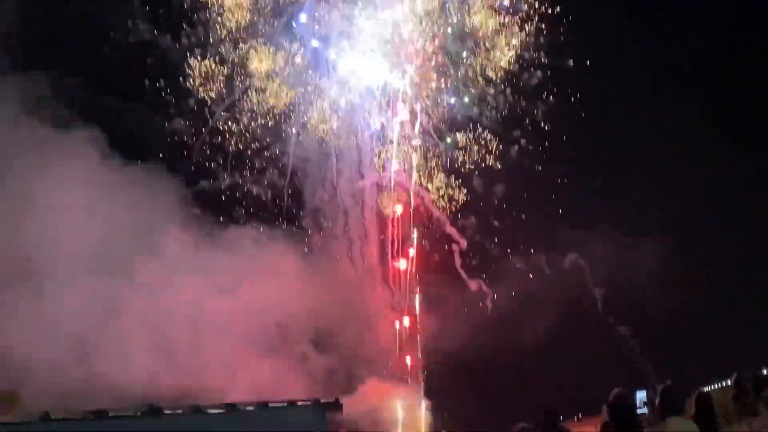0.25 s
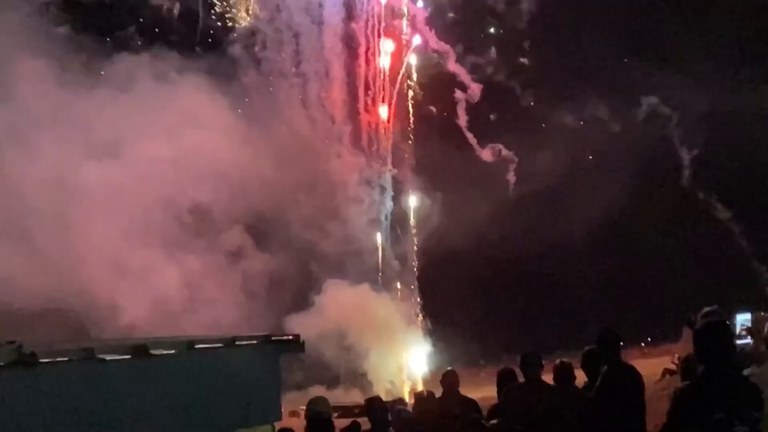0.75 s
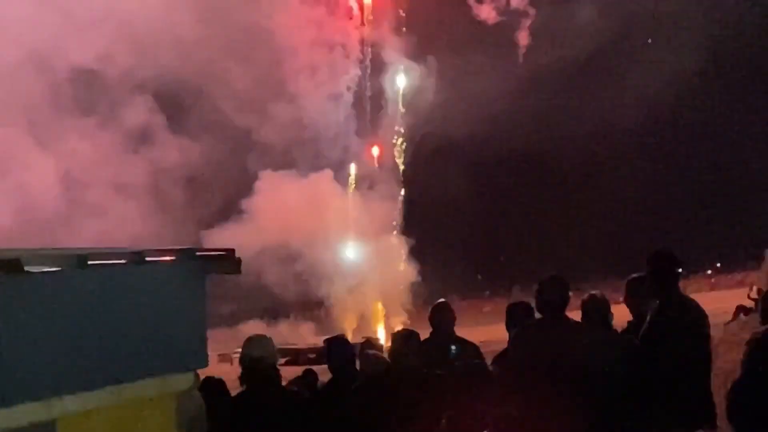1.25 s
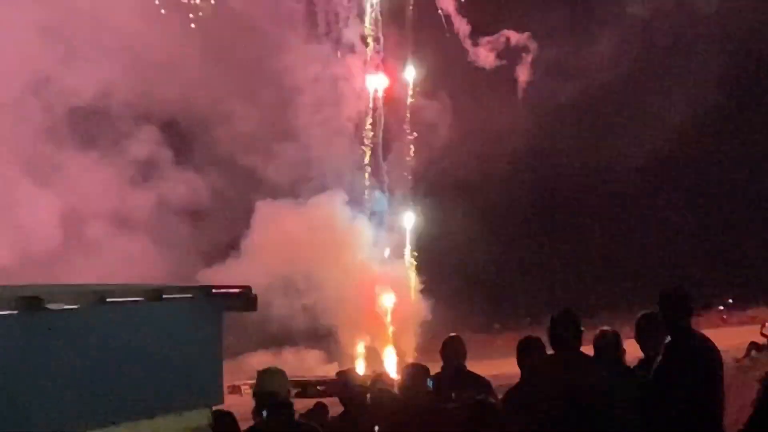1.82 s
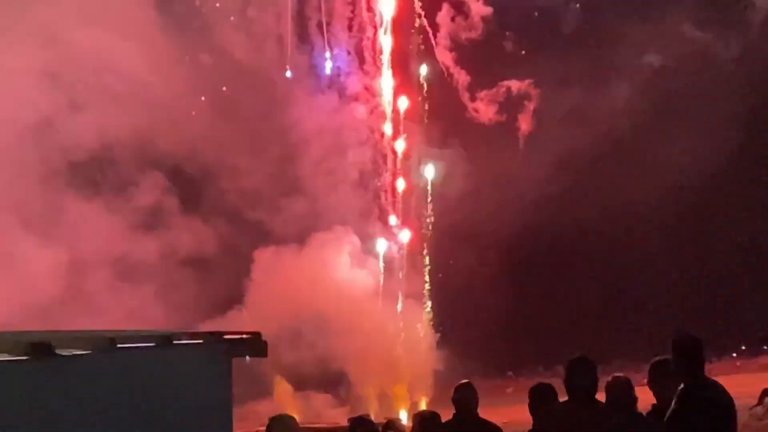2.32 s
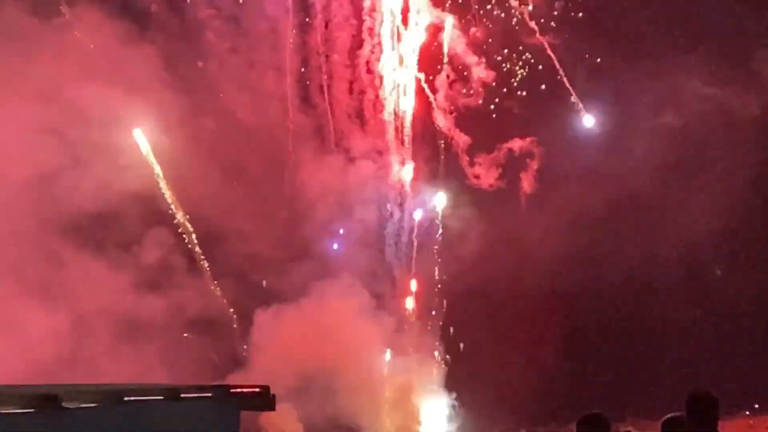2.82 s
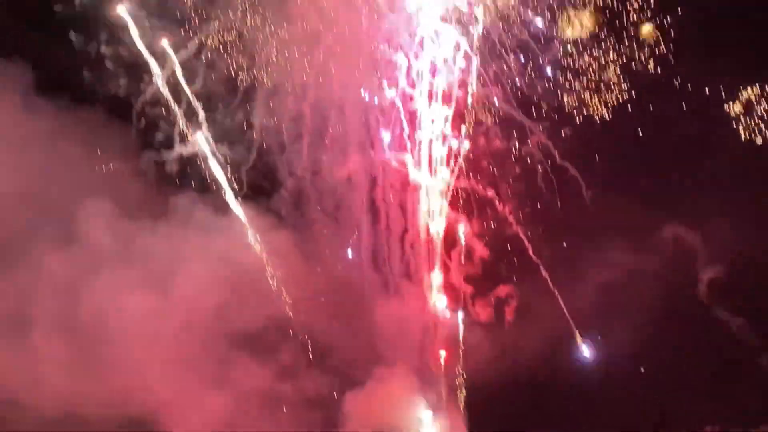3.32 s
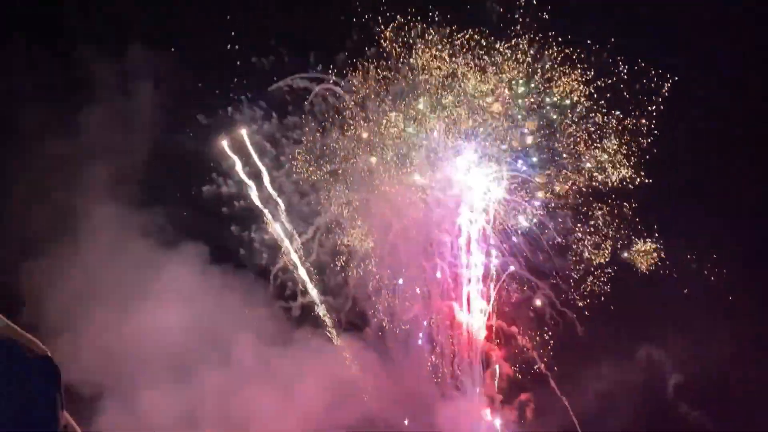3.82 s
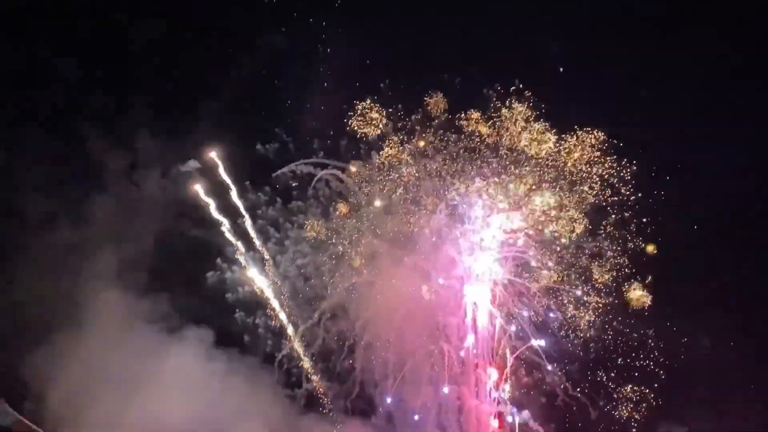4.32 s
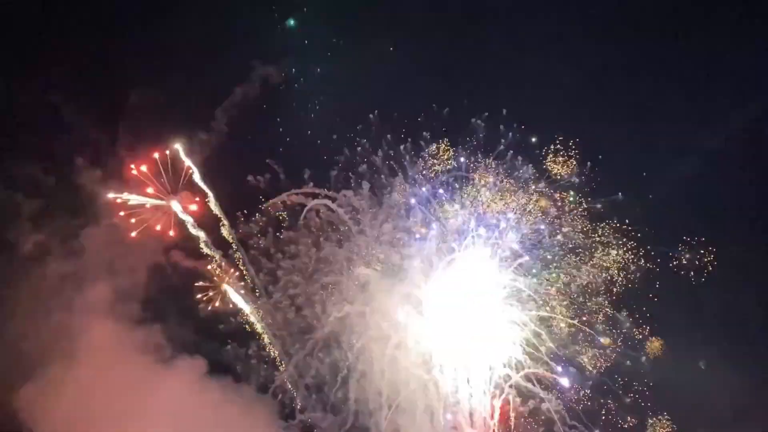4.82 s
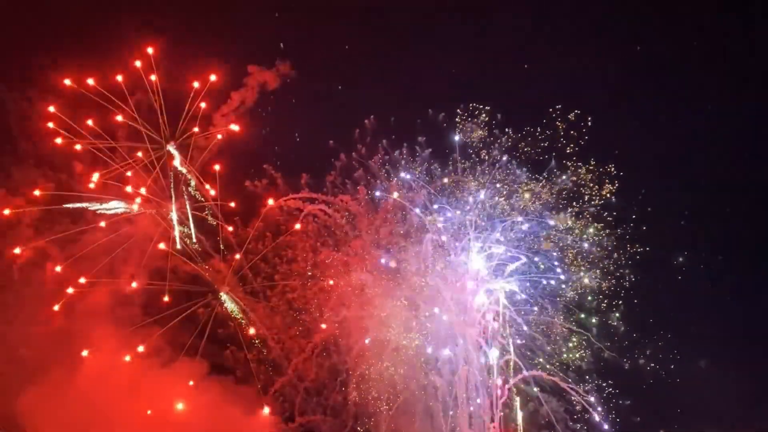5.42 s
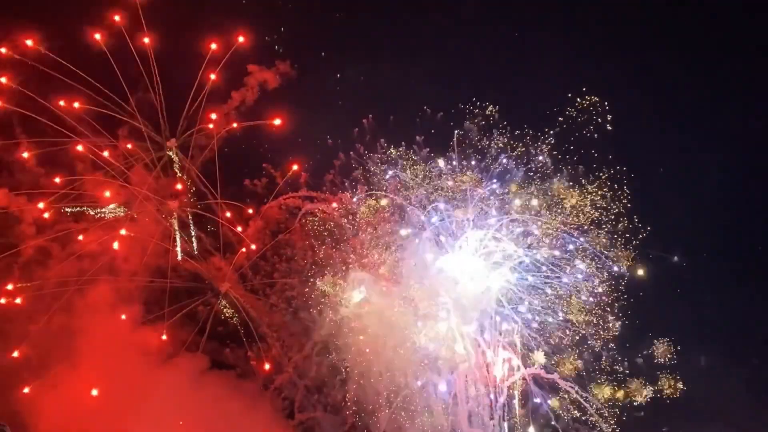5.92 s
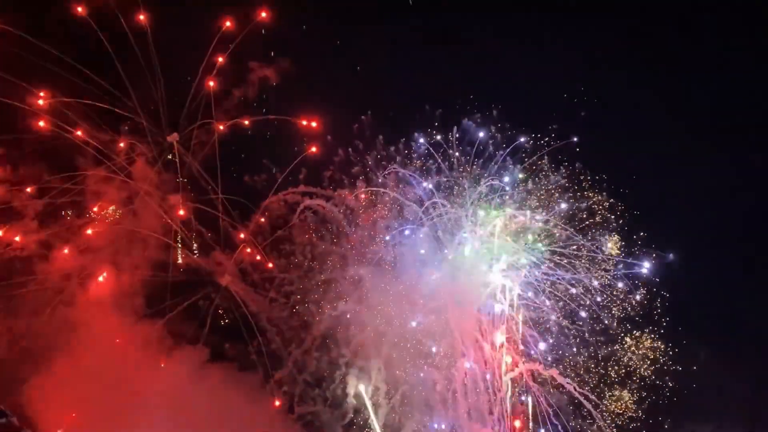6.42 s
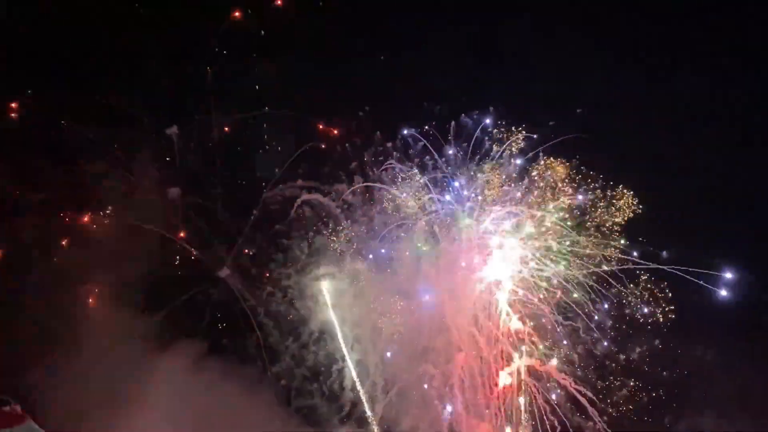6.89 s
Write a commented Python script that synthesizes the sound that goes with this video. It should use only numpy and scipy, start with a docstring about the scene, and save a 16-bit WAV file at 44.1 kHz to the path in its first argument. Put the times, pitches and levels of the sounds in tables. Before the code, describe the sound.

An unbroken volley of firework bangs, already under way and still going at the end. Punchy bursts come in ones, pairs and tight clusters over a continuous dull rumble. Dry crackle swells and dies repeatedly, thickest with snapping pops from four to six and a half seconds. Low mortar thumps and weighty booms add depth. Open ground with walls nearby, caught on a handheld phone with wide, bright cracks and rounded peaks.

```python
"""Open ground at night, in the crowd: a fireworks barrage heard on a phone.
Shells send shock fronts, ground bounces and low booms; the phone delays the lows, so bangs sweep down.
Clouds of crackling stars, built from random clicks, flare, burn and die out; stray stars pop.
Low thumps come from mortar launches and from the deep weight under a few heavy shell bursts.
Fading noise makes the echoes of nearby walls and the far field.
Halfway through, the phone swings up to the sky and the treble changes colour."""
import sys
import numpy as np
from scipy import signal
from scipy.fft import rfft, irfft, next_fast_len
from scipy.io import wavfile

SR = 44100
rng = np.random.default_rng(int(sys.argv[2]) if len(sys.argv) > 2 else 0)


def dump_mix(stems):
    """Bounce the given channels to the path in sys.argv[1] as a 16-bit WAV at rate SR."""
    frames = np.atleast_2d(stems).T  # one column per channel
    limited = np.clip(frames, -1, 1)  # hard clip at full scale
    pcm = np.round(limited * 32767).astype(np.int16)
    wavfile.write(sys.argv[1], SR, pcm)


N = 315315
TIME = np.arange(N) / SR  # seconds
KERNEL = 8192  # length of one pulse, in samples


def undb(db):
    """Turn decibels into gain."""
    return 10 ** (np.asarray(db) / 20)


def bins(size):
    """Frequencies in Hz of a real transform."""
    return np.arange(size // 2 + 1) * SR / size


def gains(points, hz):
    """Gain at each frequency, from a short table joined on a log axis."""
    point_hz, level_db = np.transpose(points)
    return undb(np.interp(np.log(hz + 1), np.log(point_hz), level_db))


def pulse(gain):
    """Spectrum of the most sudden pulse with these gains that does not start early (minimum phase)."""
    cepstrum = irfft(np.log(gain))
    cepstrum[1:KERNEL // 2] *= 2
    cepstrum[KERNEL // 2 + 1:] = 0
    return np.exp(rfft(cepstrum))


def ring(x, points):
    """Turn every click in x into a pulse with this spectrum."""
    shape = irfft(pulse(gains(points, bins(KERNEL))))
    return signal.fftconvolve(x, shape)[:N]


def clicks(times, sizes):
    """Single-sample clicks at these times in seconds."""
    places = np.clip(np.round(times * SR), 0, N - 1).astype(int)
    return np.bincount(places, sizes, N)


def walk(rate):
    """Random wander: straight lines between random levels, rate levels per second."""
    steps = rng.standard_normal(2048)
    return np.interp(TIME * rate, np.arange(len(steps)), steps)


# How unlike the echoes are at the two ports: pitch_hz, side_minus_mid_db
ECHO_SPREAD = [(50, -17), (150, -13), (300, -5), (1300, 2), (2500, -7.5), (7000, -9)]
AIR_HZ = 13500  # the air takes the top of the echoes around here


def scatter(x, points, start_s, rise_s, t60_s, db):
    """Stereo echo from many small surfaces: noise that sets in, swells and dies away within 2 s."""
    size = 2 * SR
    hz = bins(size)
    age = np.maximum(np.arange(size) / SR - start_s, 0)
    envelope = (1 - np.exp(-age / rise_s)) * np.exp(-np.log(1000) * age / t60_s)
    envelope = envelope / np.linalg.norm(envelope)
    mid, side = rfft(rng.standard_normal((2, size)) * envelope)
    side = side * gains(ECHO_SPREAD, hz)
    air = 1 / (1 + (hz / AIR_HZ) ** 10)
    response = irfft(np.array([mid + side, mid - side]) * air)
    return undb(db) * signal.fftconvolve(ring(x, points)[None], response, axes=1)[:, :N]


# Tone of the long roll over the field: pitch_hz, level_db
FIELD_TONE = [(25, -9), (55, 0.5), (110, 1.5), (280, 0), (450, -3), (800, -17), (1500, -18.5),
              (4000, -29.5), (12000, -48)]


def field_roll(shots):
    """The wide field scatters each bang back as a long, dull roll."""
    return scatter(shots, FIELD_TONE, start_s=0.0022, rise_s=0.012, t60_s=2.63, db=18.5)


# Tone of the echo from a far row of obstacles: pitch_hz, level_db
FAR_TONE = [(60, -24), (150, -1), (280, 6.5), (450, -10), (700, -18), (2000, -35.5), (8000, -49)]


def far_echo(start_s, level_db):
    """A far row of obstacles answers late and briefly, with a random strength for each bang."""
    luck_db = 3.5 * rng.standard_normal(len(start_s))
    aimed = clicks(start_s, undb(level_db + luck_db))
    return scatter(aimed, FAR_TONE, start_s=0.083, rise_s=0.0035, t60_s=0.095, db=16)


# Tone of the walls close by: pitch_hz, level_db
WALL_TONE = [(60, -43), (230, -9.5), (350, 10.5), (550, 1.5), (900, -5), (1400, -4.5), (2500, -15),
             (7000, -24.5), (10000, -28)]


def wall_echo(start_s, level_db):
    """Walls close by smear each bang almost at once."""
    # bangs take turns among six random wall echoes, so the echo colour varies
    total = 0
    for k in range(6):
        part = clicks(start_s[k::6], undb(level_db[k::6]))
        total = total + scatter(part, WALL_TONE, start_s=0.0007, rise_s=0.00007, t60_s=0.06, db=18)
    return total


def star_patter(crackle):
    """The crackle gets its own short, quick echo."""
    tone = [(200, 17.5), (1500, -8), (3000, -3.5), (10000, -8.5)]  # pitch_hz, level_db
    return scatter(crackle, tone, start_s=0.00079, rise_s=0.00026, t60_s=0.032, db=-4.5)


# Clouds of crackling stars, levels relative to each other: start_s, burn_s, level_db, brightness_db
STAR_CLOUDS = [(.17, 0.24, -39, 4), (.47, 0.14, -41, -0.5), (.64, .29, -36.5, 0.5), (.95, 0.18, -40.5, 3),
               (1.37, .35, -37.5, 1), (2.01, .2, -39, 0), (2.27, .42, -43, 1), (2.69, 0.13, -39.5, 4),
               (3.098, 0.25, -36.5, 0), (3.55, 0.059, -38.5, 7), (3.67, .21, -41, 6), (3.979, 0.22, -45, 7),
               (4.12, 0.22, -38, -1), (4.44, .3, -41, -1), (4.87, 0.13, -45, 4), (5.23, 0.073, -37.5, 2),
               (5.39, 0.1, -39.5, 0), (5.7, 0.16, -39, 4), (5.85, .45, -38.5, 2.5), (6.09, .17, -42.5, 11),
               (6.83, .15, -40.5, 0)]
CLOUD_ATTACK_S, CLOUD_T60_S = 0.041, .45  # every cloud flares and dies out alike
EMBERS_DB = -47.5  # thin crackle that lingers between the clouds, on the same scale as the clouds
EMBERS_END_S, EMBERS_LATE_DB = 6.4, -51.5  # it thins out further near the end


def clouds():
    """Level and brightness of the crackle: each cloud flares, burns evenly and dies away; their powers sum."""
    power = undb(np.where(TIME < EMBERS_END_S, EMBERS_DB, EMBERS_LATE_DB)) ** 2
    tint = np.zeros(N)
    for start_s, burn_s, level_db, bright_db in STAR_CLOUDS:
        age = TIME - start_s
        flare = np.clip(age / CLOUD_ATTACK_S, 0, 1)
        fade = np.exp(-np.log(1000) * np.maximum(age - burn_s, 0) / CLOUD_T60_S)
        share = (undb(level_db) * flare * fade) ** 2
        power = power + share
        tint = tint + share * bright_db
    return np.sqrt(power), tint / power


# Big stars that stand out of the crackle, levels relative to each other: start_s, level_db
BIG_STARS = [(.193, -23), (0.6391, -14), (1.699, -22), (2.028, -16.5), (2.952, -21), (3.0852, -19.5),
             (4.1497, -13), (4.1635, -20), (4.3376, -22), (4.478, -14.5), (4.6847, -20.5), (4.7031, -15),
             (4.7354, -19), (5.4501, -18), (5.4834, -16.5), (5.5617, -14.5), (5.5822, -17), (5.628, -16.5),
             (6.03, -18), (6.1245, -16.5), (6.321, -20), (6.3676, -18.5), (6.4612, -25.5), (6.5692, -23.5),
             (6.5868, -22.5), (6.6167, -24.5), (6.889, -15)]
# Tone of a star's snap: pitch_hz, level_db
STAR_TONE = [(60, -19), (250, -8), (600, 2), (1400, 2.5), (2000, -1), (3000, -2.5), (4500, -7), (7000, -10),
             (9000, -18), (12000, -22.5), (16000, -33)]
# Tone of the extra body in a big pop: pitch_hz, level_db
BODY_TONE = [(100, -25), (500, 1), (1500, 2), (3000, -10), (8000, -44)]
# lone stars that pop at random; levels on the same scale as the big stars
STRAY_PER_S, STRAY_DB, STRAY_SPREAD_DB = 14, -26.5, 3.5


def stars(rate, size_db, clump_db, cloud_db, pop_db, body_db, split_hz):
    """Tiny charges go off at random, more and bigger in a louder cloud; big and stray stars pop on top."""
    loud, bright_db = clouds()
    density = loud / loud.mean()
    chance = rate * density * undb(clump_db * walk(60)) / SR
    fires = rng.random(N) < chance
    size = undb(size_db * np.minimum(rng.exponential(size=N), 3))
    # even out the power first, then let the clouds set the level
    cloud = ring(fires * size / np.sqrt(density), STAR_TONE)
    cloud = undb(cloud_db) * loud * cloud / cloud.std()
    # brightness tips the balance between dull and sharp
    dull = signal.sosfilt(signal.butter(1, split_hz, fs=SR, output="sos"), cloud)
    sharp = cloud - dull
    cloud = dull * undb(-bright_db / 2) + sharp * undb(bright_db / 2)

    start_s, level_db = np.transpose(BIG_STARS)
    stray_fires = rng.random(N) < STRAY_PER_S / SR
    strays = stray_fires * undb(STRAY_DB + STRAY_SPREAD_DB * rng.standard_normal(N))
    pops = clicks(start_s, undb(level_db)) + strays
    snap = undb(pop_db) * ring(pops, STAR_TONE)
    # squared: the bigger a star, the more body its pop has
    body = undb(body_db) * ring(pops ** 2, BODY_TONE)
    return cloud + body + snap


# Low thumps: mortar launches, and the deep weight under a few heavy shell bursts.
# Levels relative to each other: start_s, level_db
LOW_THUMPS = [(2.524, -1.5), (2.63, -8), (2.839, -3), (4.406, -12), (4.971, -12), (5.313, -13),
              (6.048, -8.5)]
# Tone of a low thump: pitch_hz, level_db
THUMP_TONE = [(20, -34), (35, -13), (58, 6), (90, -0.5), (140, -10), (300, -33), (1500, -62)]


def low_thumps(thump_db):
    """Dull, low pulses: mortar launches, and the deep weight under a few heavy shell bursts."""
    start_s, level_db = np.transpose(LOW_THUMPS)
    return undb(thump_db) * ring(clicks(start_s, undb(level_db)), THUMP_TONE)


# Tone of the low boom: pitch_hz, level_db
BOOM_TONE = [(20, -56), (35, -4), (55, 6.5), (80, 0.5), (130, -19), (300, -27), (1500, -60)]


def booms(shots, boom_db, boom_lag_s):
    """The slow swell of air just behind each bang."""
    swell = np.roll(shots, int(boom_lag_s * SR))
    return undb(boom_db) * ring(swell, BOOM_TONE)


# Shell bursts, and strong ground bounces a few milliseconds after some of them.
# Levels relative to each other: start_s, level_db, weight_of_lows_db, ground_bounce_lag_s
BANG_FRONTS = [(.0402, 0.5, 1, 0.0031), (0.1771, 0, -1, 0.0036), (0.2447, 0.5, -4, 0.0037),
               (.3431, -1, 0.5, 0.004), (0.4107, -1, 5, .0046), (.4306, -1.5, 0, 0.0063),
               (.5776, .5, 2.5, 0.0044), (0.6154, 1, -1.5, 0.0041), (0.8857, 1, -4, .0041),
               (1.0094, 0, 2.5, 0.004), (1.0867, -0.5, 1, 0.0041), (1.1459, 1, -3, .0042),
               (1.3403, -0.5, 0, 0.0039), (1.4415, 0, -3, 0.0067), (1.5313, -0.5, 0.5, 0.0039),
               (1.7781, 0, 0, 0.0039), (1.9605, 0.5, 0.5, 0.0042), (2.1501, 1, 3, 0.0042),
               (2.267, 0, -1, 0.0044), (2.285, -0.5, -2, .0039), (2.3353, 0.5, -2.5, .0064),
               (2.399, 1.5, -2.5, 0.004), (2.6267, 0, 5, 0.004), (2.75, 0, -0.5, 0.004),
               (2.8104, 1, 2.5, 0.0036), (3.1413, 0.5, 0.5, 0.0067), (3.2315, 0, .5, 0.0038),
               (3.2737, -.5, 1.5, 0.004), (3.4506, .5, -2, 0.0046), (3.4596, -.5, -2, 0.0044),
               (3.615, -0.5, -1, .0041), (3.7223, -1, 2, 0.0076), (3.738, -1.5, -1, .0063),
               (3.8785, -0.5, 1, 0.0065), (4.2528, -1.5, -3, 0.0046), (4.3163, -1, 2.5, .0043),
               (4.404, -2, 0, 0.0044), (4.408, -0.5, -6, 0.0059), (4.5134, -1, -8, 0.004),
               (4.6013, -1.5, 3, 0.0065), (4.8505, -1, 7, 0.0045), (4.8591, -2, 2, 0.0039),
               (4.8822, -2.5, -1, 0.0061), (4.962, -2.5, -6, .0043), (4.9815, -3.5, 12, .0055),
               (4.988, -6, 9, 0.0025), (5.0958, 1.5, -2, 0.00205), (5.102, -3.5, 14.5, .0055),
               (5.1284, -5, -3, 0.0061), (5.171, -2, -2, .0043), (5.2908, 0, 2, 0.0027),
               (5.318, -2.5, 13.5, .006), (5.3246, -5.5, 11, 0.0026), (5.4656, -13, -9, 0.0053),
               (5.7931, .5, -1.5, 0.0043), (5.8491, 0, -1, .0065), (5.8859, -1.5, 3, 0.004),
               (6.4055, -1, -3.5, 0.0043), (6.682, -0.5, 1.5, 0.0037), (6.8145, .5, -5, .0064),
               (6.8342, -1.5, 5, 0.0045), (6.9063, -.5, .5, 0.0023), (6.9124, -3, 1, .0061),
               (6.9636, -1, -2.5, 0.0039), (6.9854, -1, 4, .0044), (7.0549, -1.5, -1, .0039)]
# Tone of the shock front: pitch_hz, level_db
BLAST_TONE = [(40, -42), (100, -17), (170, -5.5), (250, 2), (370, -4.5), (510, -2), (680, -8.5), (900, -16),
              (1300, -15), (2000, -22.5), (2800, -24), (4500, -30), (7000, -31), (9000, -38.3)]
GROUND_DB, GROUND_HZ = -13, 1500  # strength of the weak ground bounce, and where it starts to dull
CRACK_SLOPE = 0.49  # dB of crack gained for each dB of a bang's level


def bangs(blast_db, crack_hz, weight_hz, colour_db):
    """Shock fronts of shell bursts and of some strong ground bounces, each with a weak, duller bounce."""
    out = np.zeros(N + KERNEL)
    hz = bins(KERNEL)
    octaves = np.geomspace(400, 12800, 11)  # half an octave apart
    chance = rng.standard_normal((len(BANG_FRONTS), len(octaves)))
    treble = hz ** 2 / (hz ** 2 + crack_hz ** 2)
    bass = weight_hz ** 2 / (hz ** 2 + weight_hz ** 2)
    for (start_s, level_db, weight_db, lag_s), luck in zip(BANG_FRONTS, chance):
        # no two fronts have the same colour
        colour = gains(np.column_stack([octaves, colour_db * luck]), hz) ** np.sqrt(treble)
        crack_db = CRACK_SLOPE * level_db
        strength = undb(level_db * (1 - treble) + crack_db * treble + weight_db * bass)
        front = pulse(gains(BLAST_TONE, hz) * colour * strength)
        late = np.exp(-2j * np.pi * hz * lag_s)
        bounce = undb(GROUND_DB) * late / np.sqrt(1 + hz / GROUND_HZ)
        i = int(round(start_s * SR))
        out[i:i + KERNEL] += irfft(front * (1 + bounce))
    return undb(blast_db) * out[:N]


def scene():
    """Adds up the echoes, the crackle, the lows and the bangs."""
    start_s, level_db = np.transpose(BANG_FRONTS)[:2]
    shots = clicks(start_s, undb(level_db))
    roll = field_roll(shots)
    far = far_echo(start_s, level_db)
    walls = wall_echo(start_s, level_db)
    crackle = stars(rate=520, size_db=5.0, clump_db=3.0, cloud_db=1.5, pop_db=16.0, body_db=28.5, split_hz=1900)
    patter = star_patter(crackle)
    thumps = low_thumps(thump_db=39)
    boom = booms(shots, boom_db=20.0, boom_lag_s=0.0048)
    direct = bangs(blast_db=36, crack_hz=1170, weight_hz=211, colour_db=3.0)
    return roll + far + walls + patter + crackle + thumps + boom + direct


def padded_size():
    """An even transform length with room for the tails."""
    size = next_fast_len(N + KERNEL, True)
    return size + size % 2


# Microphone colour held level, against the average; aimed at the sky it is the reverse: pitch_hz, level_db
LEVEL_COLOUR = [(1500, 0), (2500, 1), (3600, -1), (5500, 0), (8500, -0.5), (10700, 3), (13000, 1),
                (15500, -1)]
TILT_S, TILT_TIME_S = 3.5, 0.61  # middle of the swing up to the sky, and how long it takes


def aim(x):
    """The phone swings up from level to the sky, which recolours the treble."""
    size = padded_size()
    spectrum = rfft(x, size)
    colour = gains(LEVEL_COLOUR, bins(size))
    held_level = irfft(spectrum * colour)[:, :N]
    to_sky = irfft(spectrum / colour)[:, :N]
    up = np.clip((TIME - TILT_S) / TILT_TIME_S + .5, 0, 1)
    return (1 - up) * held_level + up * to_sky


def phase_turn(hz, centre_hz, width_hz):
    """All-pass resonance: holds back the sound near its centre without changing its level."""
    pole = centre_hz ** 2 - hz ** 2 + 1j * hz * width_hz
    return pole.conj() / pole


# Balance of the two microphone ports: pitch_hz, left_minus_right_db
PORT_COLOUR = [(60, -1), (250, -1.8), (450, -1.4), (640, -1), (900, -1.5), (1100, 2.5), (1400, -5),
               (2200, 2), (6000, 0.4), (10000, 0.5)]
PORT_SPLIT_HZ, PORT_LEAD_S = 6900, (.00012, .000358)  # above this pitch, each port runs ahead by its lead
TOP_HZ = 16100  # the phone passes little above this


def record(dry):
    """The phone delays the lows, colours each port, rounds the loudest peaks and cuts the top."""
    size = padded_size()
    hz = bins(size)
    delay = phase_turn(hz, centre_hz=244, width_hz=380) ** 2
    delay = delay * (1090 - 1j * hz) / (1090 + 1j * hz)  # a gentler all-pass on top
    balance = gains(PORT_COLOUR, hz) ** np.array([[.5], [-.5]])
    low_cut = (1j * hz / (1j * hz + 20)) ** 2
    # in the high treble the two ports are out of step, so cracks spread wide
    lead = np.exp(2j * np.pi * np.outer(PORT_LEAD_S, np.maximum(hz - PORT_SPLIT_HZ, 0)))
    x = irfft(rfft(aim(dry), size) * delay * low_cut * balance * lead)[:, :N]
    x = x / (1 + (x / .95) ** 8) ** (1 / 8)  # peaks bend over towards 0.95
    top_cut = signal.firwin(101, TOP_HZ, fs=SR, window="blackman")
    return signal.fftconvolve(x, top_cut[None], "same", axes=1)


dry = scene()
out = record(dry)
dump_mix(out)
```